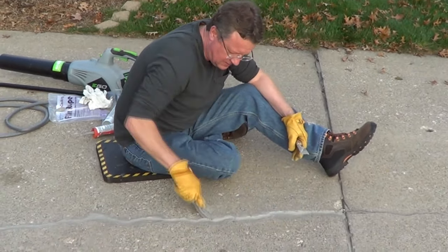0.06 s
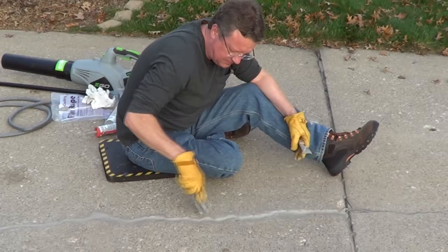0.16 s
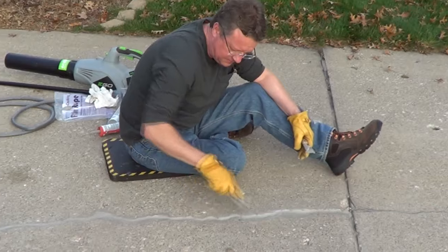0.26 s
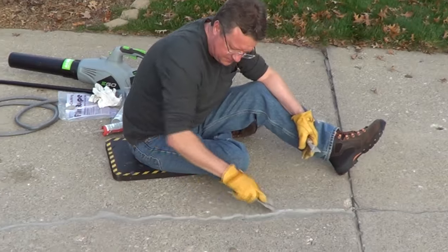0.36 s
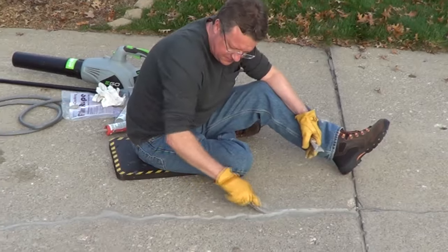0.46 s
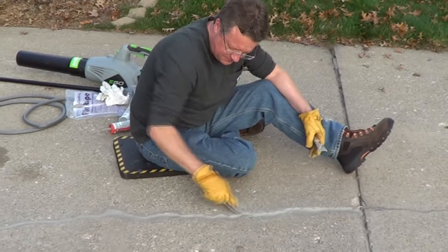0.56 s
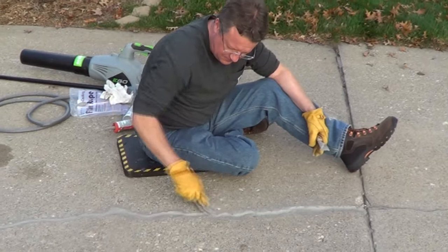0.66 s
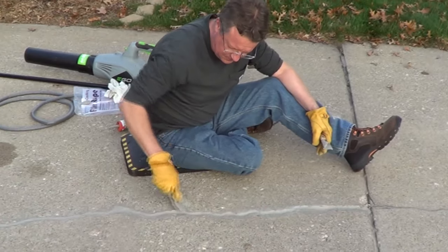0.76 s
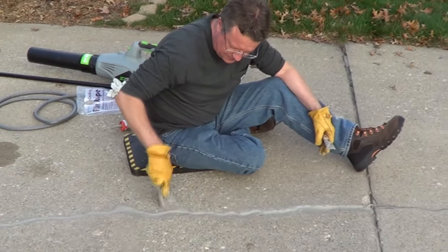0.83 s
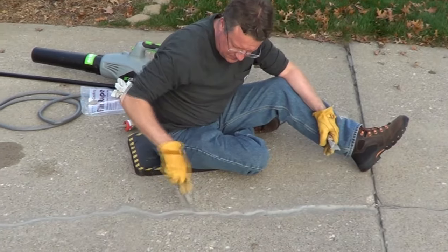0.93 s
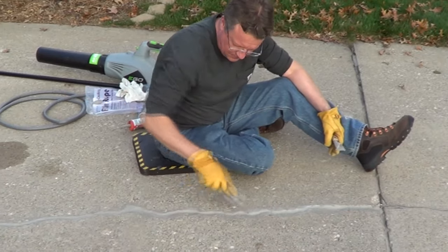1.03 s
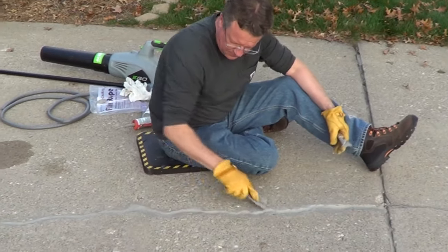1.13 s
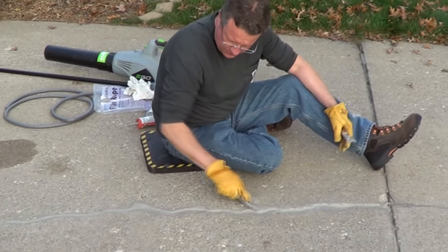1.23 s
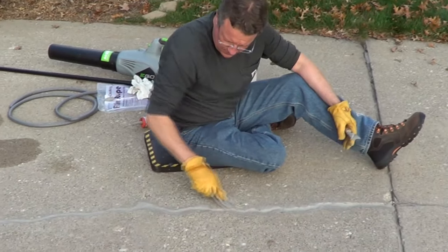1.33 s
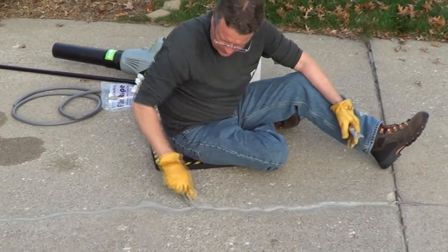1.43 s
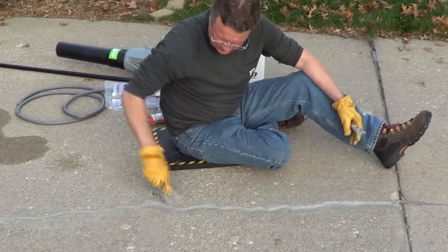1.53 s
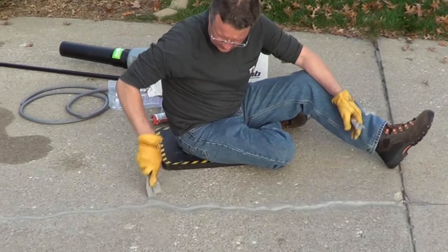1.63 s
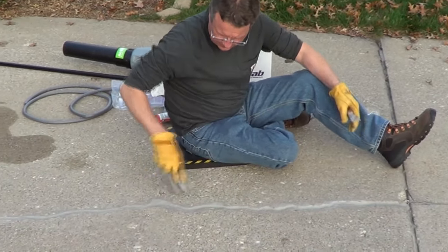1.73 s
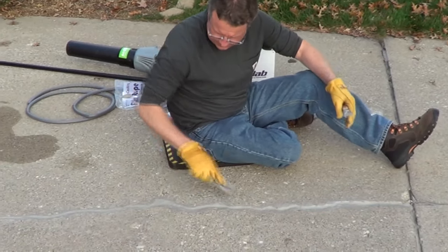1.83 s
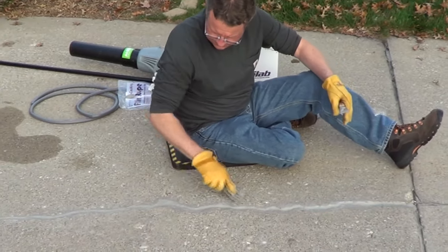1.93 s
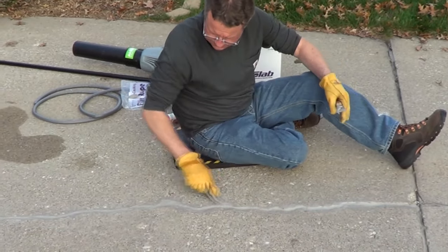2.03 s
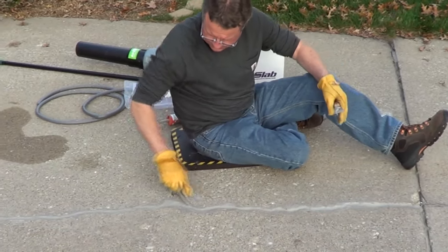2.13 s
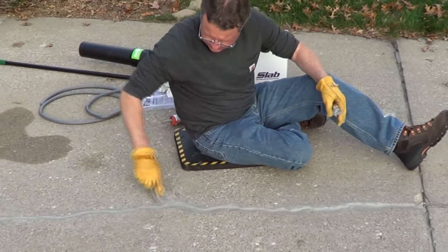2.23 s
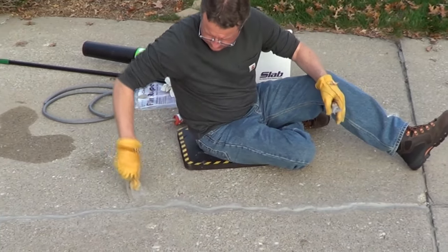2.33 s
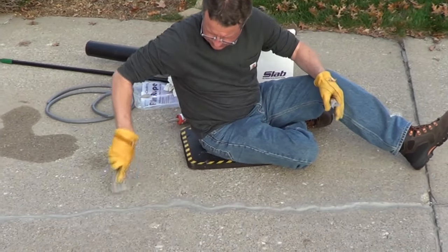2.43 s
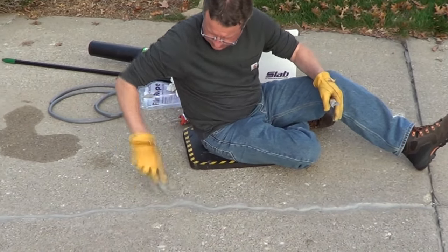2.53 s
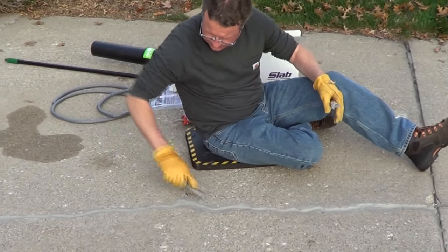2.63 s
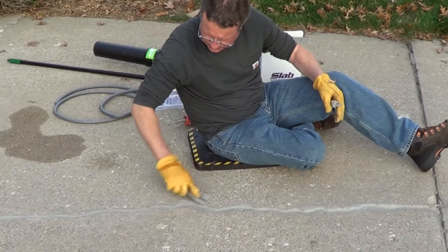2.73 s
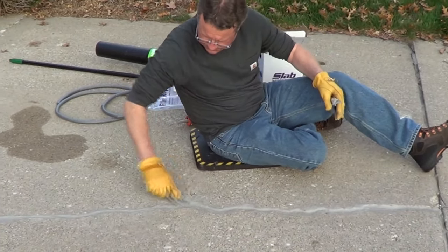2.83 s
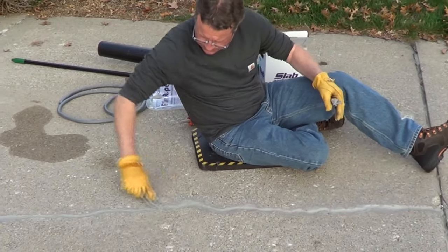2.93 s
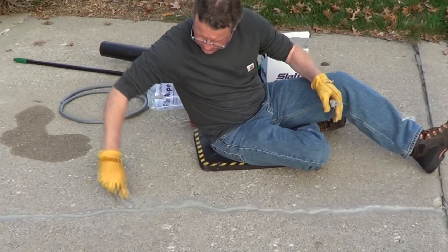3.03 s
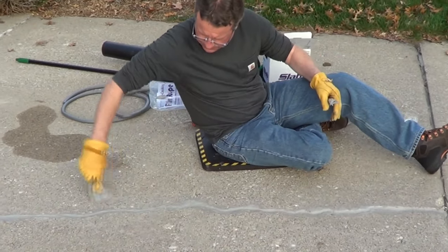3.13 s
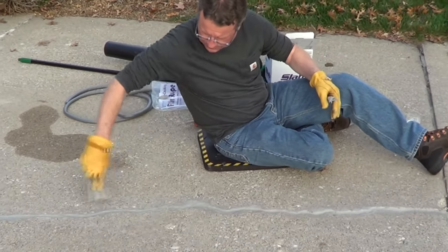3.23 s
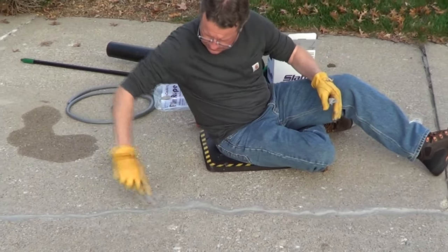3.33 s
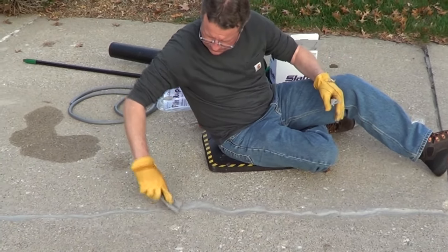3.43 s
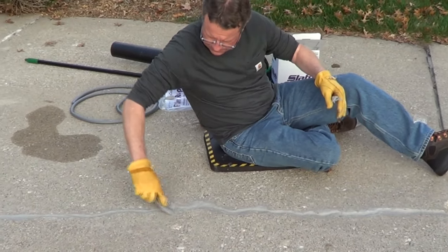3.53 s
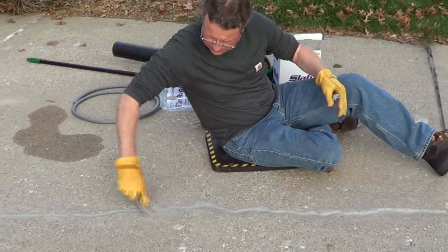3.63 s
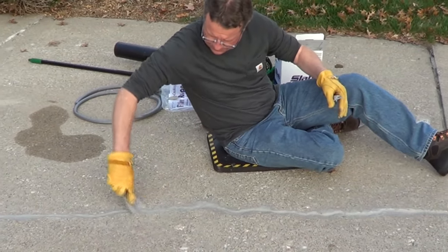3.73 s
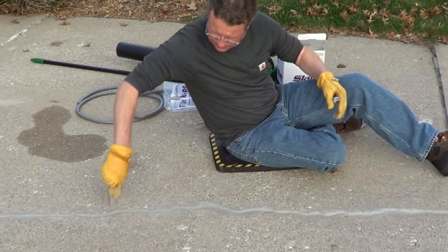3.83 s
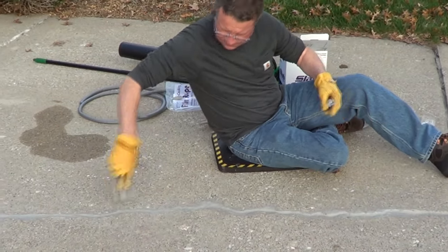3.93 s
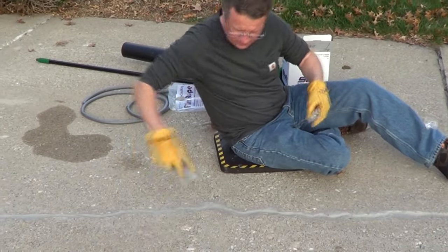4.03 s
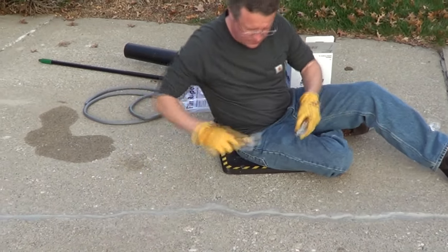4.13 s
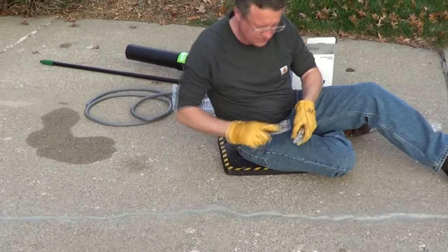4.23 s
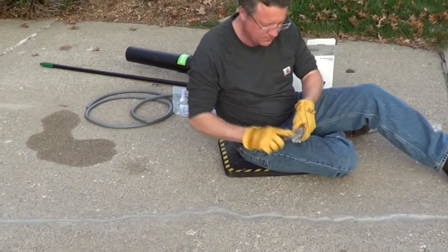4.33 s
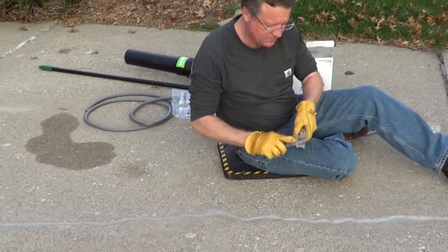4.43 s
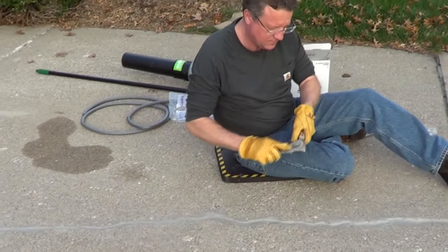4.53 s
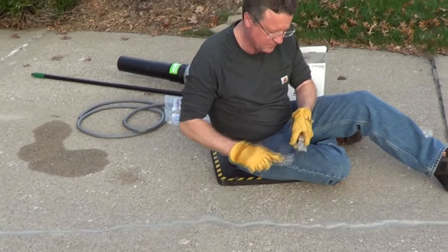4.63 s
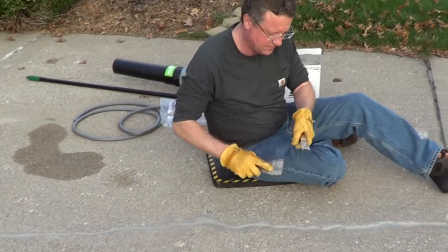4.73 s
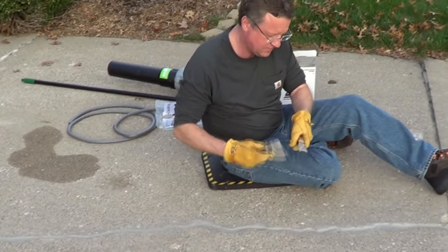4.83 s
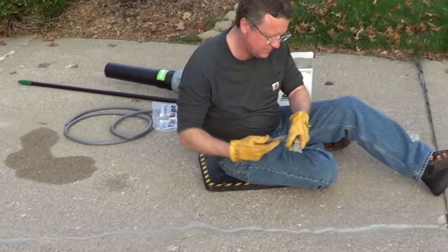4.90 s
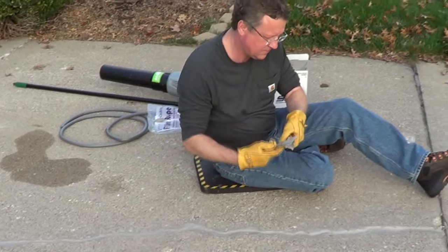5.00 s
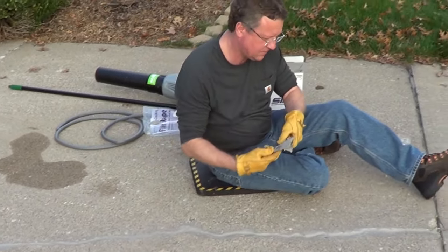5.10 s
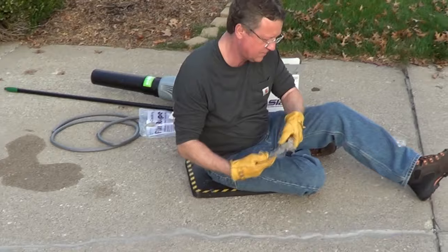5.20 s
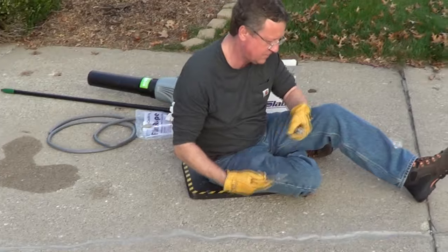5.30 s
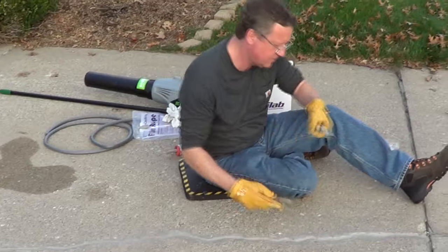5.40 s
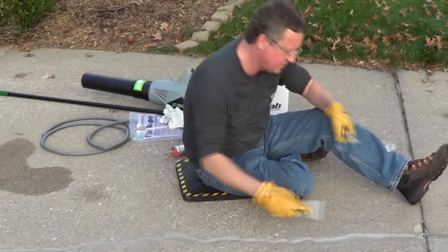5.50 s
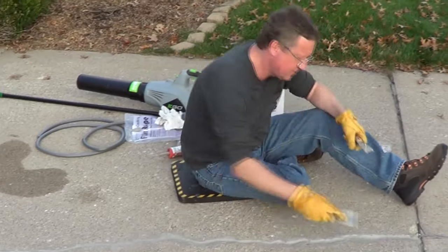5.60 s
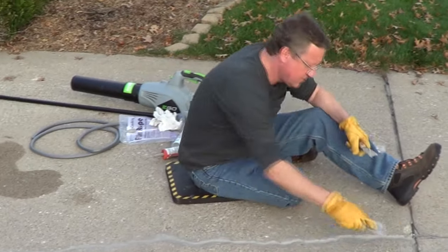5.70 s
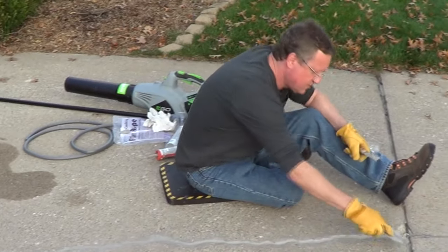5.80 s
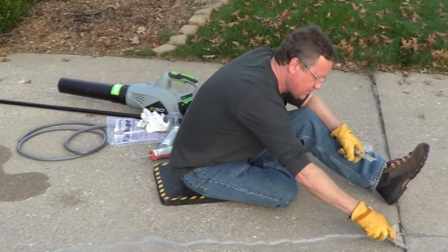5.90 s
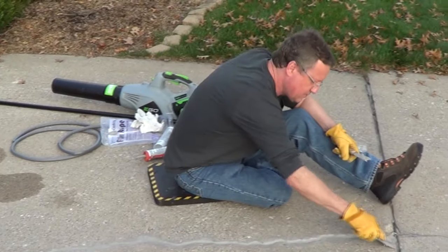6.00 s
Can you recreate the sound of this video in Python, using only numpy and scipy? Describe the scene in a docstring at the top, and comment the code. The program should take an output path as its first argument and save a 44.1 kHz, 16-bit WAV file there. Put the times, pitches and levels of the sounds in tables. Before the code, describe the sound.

A steel hand scraper makes six short gritty strokes on concrete, then two blades wipe and clink together, over distant traffic.

```python
"""Gritty scraping: a steel hand scraper smooths sealant along a crack in a concrete driveway.
Six short strokes, the first under way, the rest begun with a tap; grit catches and rings the blade.
The handle knocks in the glove; then the blade is wiped twice on a second knife, with hiss and clinks.
House fronts return a soft echo over distant traffic, a far engine drone and one passing motor."""
import sys
import numpy as np
from scipy import signal
from scipy.fft import rfft, irfft, next_fast_len
from scipy.io import wavfile
from scipy.ndimage import uniform_filter1d

SR = 44100
rng = np.random.default_rng(int(sys.argv[2]) if len(sys.argv) > 2 else 0)


def dump_mix(stems):
    """Bounce the given channels to the path in sys.argv[1] as a 16-bit WAV at rate SR."""
    frames = np.atleast_2d(stems).T  # one column per channel
    limited = np.clip(frames, -1, 1)  # hard clip at full scale
    pcm = np.round(limited * 32767).astype(np.int16)
    wavfile.write(sys.argv[1], SR, pcm)


N = 267069
TIME_S = np.arange(N) / SR
FFT_SIZE = next_fast_len(N + SR)
FREQ_HZ = np.maximum(np.arange(FFT_SIZE // 2 + 1) * SR / FFT_SIZE, 1)

# strokes: start/s, attack/s, lift/s, level at lift/dB, fine grit/dB, pitch factor, edge singing/dB
STROKES = [ (-0.12, .04, 0.22, -17, 1.5, 1, 2.5), (0.544, 0.036, 0.935, -17, 1, 1.008, 1),
           (1.302, 0.049, 1.728, -16.5, -0.5, 1.001, 0.5), (2.057, 0.031, 2.5, -16.5, -1.5, 1.013, 0),
           (2.84, .052, 3.281, -18, -0.4, 1.004, 1), (3.605, 0.11, 3.947, -16.5, -1.5, 1.012, 0.5), ]
# steel modes: f/Hz, width/Hz, level/dB
PRESSED_BLADE_MODES = [(659, 210, -7.5), (1115, 640, -7.5), (1528, 310, 0), (2157, 335, 2), (2830, 530, -1),
                       (3600, 480, -1.5), (4474, 450, -3.5), (5060, 610, -0.5), (5790, 160, -1.5),
                       (6370, 370, -3), (7010, 500, -3), (7800, 580, 1), (8980, 820, -3), (10200, 1240, -4),
                       (11840, 1100, -4.5)]
THIN_EDGE_MODES = [(8330, 510, 0.5), (10870, 990, -5)]
FREE_BLADE_MODES = [(1660, 160, 5.5), (2200, 230, -9.5), (3000, 450, -30), (3560, 200, 7), (4640, 330, 2),
                    (5730, 480, 5), (6900, 560, 3), (8100, 710, 2), (8900, 640, 8), (10530, 700, 5.5),
                    (11640, 950, 3)]  # barely touching the slab
KNIFE_PAIR_MODES = [(2090, 380, -4.5), (2750, 250, -4), (3280, 300, -1), (3640, 250, -2), (4550, 450, -5),
                    (5500, 450, .5), (6350, 350, .5), (7000, 400, -2), (7750, 380, 2), (8600, 800, 0),
                    (10480, 600, -3), (11550, 650, -1.5)]
# noise spectra: f/Hz, level/dB
GRIT_SPECTRUM = [(250, -16), (550, -5.5), (1200, 1), (3000, -1), (6000, -1.5), (9000, -2), (12000, -8),
                 (13300, -4), (15000, 1), (15800, -21)]
TRAFFIC_SPECTRUM = [(15, -64), (25, -31), (82, -15), (129, -9), (193, -0.5), (281, -3.5), (399, -11.5),
                    (457, -12.5), (509, -12.5), (762, -8.5), (1340, -13.5), (3530, -29.5), (3930, -27),
                    (13500, -38.5), (15500, -41)]
WIPE_SPECTRUM = [(600, -22), (1300, -10), (2200, -0.5), (5000, -1), (9000, 3.5), (11500, 5), (13300, -2),
                 (15800, -5)]
# yard echo: f/Hz, level/dB, t60/s
ECHO_BANDS = [(418, -24.5, 0.74), (905, -23, 1.1), (1410, -20, 0.64), (3140, -23.5, 0.89),
              (5200, -25, 0.95), (7000, -26.5, 0.89), (9700, -26, 0.49), (14000, -38, 0.25)]
# engine orders: f/Hz, level/dB
DRONE_ORDERS = [(93.5, -67.5), (142, -65), (187, -58), (281, -59.5), (472, -62.5)]
PASSING_ORDERS = [(104, -64), (167, -57), (281, -50.5), (319, -55)]
# edge lands or skips on the slab: t/s, level/dB
TAPS = [(0.5203, -12), (0.568, -15), (1.2679, -15), (1.306, -22), (1.327, -12.5), (2.0522, -15),
        (2.057, -13.5), (2.805, -17), (2.856, -15.5), (3.5665, -18), (3.595, -22), (3.609, -17),
        (3.6385, -18.5)]
# handle in the glove: t/s, level/dB, f/Hz, width/Hz
KNOCKS = [(2.519, -29, 850, 220), (3.973, -24.5, 900, 197.8), (4.442, -38, 2440, 1300),
          (4.459, -37.5, 2900, 2200), (4.714, -27, 1330, 1200)]
# knives meet or slip off: t/s, level/dB, rise/s, decay/s
CLINKS = [(4.46, -43, 0.0012, 0.00238), (4.547, -32, 0.00018, 0.00097), (4.693, -23.5, .0002, 0.0014),
          (4.7121, -18, 0.0025, 0.0035), (5.115, -9.5, 0.000715, 0.0013), (5.149, -25, 0.00073, 0.0036),
          (5.1966, -19, .0003, 0.0033), (5.312, -13, 0.0024, 0.0047)]
# steel slides on steel: start/s, end/s, level/dB
WIPES = [(4.549, 4.708, -44.5), (5.14, 5.309, -33)]
# width of diffuse sound: f/Hz, side minus mid/dB
DIFFUSE_SIDE = [(30, -28), (250, -26), (600, -20), (1400, -7), (3500, -3), (7000, -6), (12000, -22)]
# hand position and microphone port sensitivity: f/Hz, left minus right/dB
HAND_PAN = [(500, .3), (2000, .9), (4500, 2.3), (7500, 3.2), (9500, .3), (11000, 0)]
PORT_BALANCE = [(60, .4), (500, 1.2), (2000, 1.2), (4500, 0), (8000, -.6), (11000, 0)]
# phase between the ports: f/Hz, left lead/rad
PORT_LEAD = [(30, .1), (120, 0.38), (250, 0.7), (520, 1.18), (1210, 1.41), (2930, 1.01), (5200, 0.75),
             (7500, 0.67), (10000, 0)]


def undb(db):
    """Decibels to gain."""
    return 10 ** (np.asarray(db) / 20)


def unit(x):
    """Scale to rms 1."""
    return x / np.sqrt(np.mean(x ** 2))


def spectrum(rows):
    """Frequency table interpolated to every bin."""
    hz, values = np.transpose(rows)
    return np.interp(np.log(FREQ_HZ), np.log(hz), values)


def shape(x, response):
    """Apply a frequency response."""
    return irfft(rfft(x, FFT_SIZE) * response, FFT_SIZE)[..., :N]


def colour(rows):
    """Minimum-phase response of unit power from f/Hz, level/dB rows."""
    cepstrum = irfft(np.log(unit(undb(spectrum(rows))) + 1e-6), FFT_SIZE)
    cepstrum[1:FFT_SIZE // 2] *= 2
    cepstrum[FFT_SIZE // 2 + 1:] = 0
    return np.exp(rfft(cepstrum))


def lowpass(hz):
    """Zero-phase response, 24 dB/octave."""
    return 1 / (1 + (FREQ_HZ / hz) ** 4)


def noise():
    """White noise, rms 1."""
    return rng.standard_normal(N)


def walk(rate_hz):
    """Smoothly joined random levels, spread near 1."""
    step = max(int(SR / rate_hz), 2)
    levels = np.repeat(rng.standard_normal(N // step + 1), step)
    return 1.155 * uniform_filter1d(levels, step)[:N]


def gate(start_s, end_s, rise_s, fall_s):
    """Envelope: 1 from start to end, exponential flanks outside."""
    return np.exp(-np.maximum(start_s - TIME_S, 0) / rise_s - np.maximum(TIME_S - end_s, 0) / fall_s)


def stick_slip(rate_hz, spread_db, decay_s, bed):
    """Roughness over a bed of even friction: the longer the stick, the harder the slip."""
    stick_draw, strength_draw = np.clip(rng.standard_normal((N // 20, 2)), -2, 2).T
    stick = np.exp(.45 * stick_draw)
    at = np.cumsum(stick * SR / rate_hz).astype(int)
    energy = stick * undb(spread_db * strength_draw) ** 2
    slips = np.bincount(at[at < N], energy[at < N], N)
    power = signal.lfilter([1], [1, -np.exp(-2 / (decay_s * SR))], slips)
    return unit(np.sqrt(power / power.mean() + bed))


def ring(force, modes, pitch=1, flare_db=0):
    """Grains hit different spots: each mode gets a random share, swelling as the tool rocks."""
    out, live = np.zeros(N), force > 1e-9
    rocking = walk(rate_hz=55)
    for hz, width_hz, db in modes:
        share = rng.standard_normal(live.sum())
        share *= undb(flare_db * np.roll(rocking, rng.integers(N))[live])
        b, a = signal.iirpeak(hz * pitch, hz * pitch / width_hz, fs=SR)
        out[live] += undb(db) * signal.lfilter(b, a, signal.lfilter(b, a, force[live] * share))
    power = sum(undb(db) ** 2 * np.pi * width_hz / SR / 2 for _, width_hz, db in modes)
    return out / np.sqrt(power)


def scraping():
    """Edge on concrete: coarse grit growls low in the blade, fine grit hisses, the thin edge sings."""
    touch_db, lean_db_per_s = -14, 9  # light start, then the hand leans in
    fine_db_per_s = -16.5  # the blade flattens along the stroke
    dig_db, dig_s = 1.5, .035  # the edge digs in just before the lift
    roughness = stick_slip(rate_hz=400, spread_db=2.1, decay_s=.0014, bed=.45)
    roughness *= undb(1.57 * walk(rate_hz=22))  # rougher and smoother patches
    grit_colour, out = colour(GRIT_SPECTRUM), 0
    for start_s, attack_s, lift_s, db, fine_db, pitch, sing_db in STROKES:
        bite = np.clip((TIME_S - start_s) / attack_s, 0, 1)
        from_lift_s = np.clip(TIME_S, start_s, lift_s) - lift_s
        pressure = undb(db + touch_db * (1 - bite) + lean_db_per_s * from_lift_s)
        force = roughness * pressure * gate(start_s, lift_s, rise_s=.002, fall_s=.008)
        blade = undb(-3) * ring(force, PRESSED_BLADE_MODES, pitch, flare_db=2.5)
        edge = undb(sing_db - 8.5) * ring(force, THIN_EDGE_MODES, pitch, flare_db=2.5)
        grit = undb(-10) * shape(force * noise(), grit_colour)
        scrape = blade + edge + grit
        low = shape(scrape, lowpass(hz=3000))
        high = shape(scrape, 1 - lowpass(hz=6800))
        middle = scrape - low - high
        coarse_gain = undb(.12 + dig_db * np.exp(from_lift_s / dig_s))
        fine_gain = undb(fine_db - 3 + fine_db_per_s * from_lift_s)
        out = out + coarse_gain * low + middle + fine_gain * high
    return out


def diffuse(mid, side):
    """Sound from all around: wide in the upper mids, near mono in bass and high treble."""
    return mid + np.array([[1], [-1]]) * shape(side, undb(spectrum(DIFFUSE_SIDE)))


def echo_pattern():
    """Mid and side impulse response of house fronts and trees, in quarter octaves."""
    tail, age_s, bin_hz = 0, TIME_S[:SR], np.arange(SR // 2 + 1)
    white = rfft(rng.standard_normal((2, SR)))
    hz, *columns = np.transpose(ECHO_BANDS)
    near_walls = undb(16.5 - 60 * age_s / .24)
    for low_hz in 350 * 2 ** (np.arange(23) / 4):
        db, t60_s = (np.interp(np.log(low_hz * 1.09), np.log(hz), column) for column in columns)
        band = (bin_hz >= low_hz) & (bin_hz < low_hz * 2 ** .25)
        street = undb(-60 * age_s / t60_s)
        tail = tail + undb(db) * (near_walls + street) * irfft(white * band, SR)
    onset = np.clip(age_s / .0013, 0, 1)
    return tail * onset / np.sqrt(SR / 10)


def yard_echo(x, patterns=3):
    """Summed over all directions, steel peaks blur to hiss; the moving hand crossfades echo patterns."""
    envelope = np.sqrt(np.abs(uniform_filter1d(x ** 2, size=220)))
    radiated = undb(-3) * x + undb(.5) * shape(envelope * noise(), colour(GRIT_SPECTRUM))
    mid_side = 0
    for k in range(patterns):
        share = np.sqrt(2 / patterns) * np.cos(np.pi * (2.732 * TIME_S + k / patterns))
        mid_side = mid_side + shape(radiated * share, rfft(echo_pattern(), FFT_SIZE))
    return diffuse(*mid_side)


def swell_db(far_db, rise_db, peak_s, half_width_s):
    """Level of a source that nears and recedes."""
    return far_db + rise_db / (1 + ((TIME_S - peak_s) / half_width_s) ** 2)


def traffic():
    """Far roads: boom, rumble and tyre hiss, each swelling once."""
    road_colour = colour(TRAFFIC_SPECTRUM)
    roads = diffuse(shape(noise(), road_colour), shape(noise(), road_colour))
    deep, low = lowpass(hz=110), lowpass(hz=400)
    boom_db = swell_db(far_db=-9, rise_db=12, peak_s=6, half_width_s=2.9)
    rumble_db = swell_db(far_db=-9.5, rise_db=8, peak_s=4.5, half_width_s=.7)
    hiss_db = swell_db(far_db=-2, rise_db=5.5, peak_s=5.5, half_width_s=1.33)
    boom = shape(roads, deep) * undb(boom_db)
    rumble = shape(roads, low - deep) * undb(rumble_db + 3 * walk(rate_hz=3.91))
    hiss = shape(roads, 1 - low) * undb(hiss_db + .5 * walk(rate_hz=3.8))
    return boom + rumble + hiss


def engine(orders, waver, flutter_db):
    """Far engine orders that waver and fade on their way through the air."""
    warped_s = np.cumsum(1 + waver * walk(rate_hz=3)) / SR
    out = 0
    for hz, db in orders:
        rms = undb(db + flutter_db * walk(rate_hz=6.5))
        out = out + np.sqrt(2) * rms * np.sin(2 * np.pi * hz * warped_s)
    return out


def taps():
    """The edge lands with a brief rattle and bounces once."""
    bounce_s, bounce_db, force = .019, -14.5, 0
    for land_s, db in TAPS:
        for t_s, hit_db in (land_s, db), (land_s + bounce_s, db + bounce_db):
            force = force + undb(hit_db) * gate(t_s, t_s, rise_s=.0001, fall_s=.0027)
    blade = undb(-3) * ring(force, FREE_BLADE_MODES)
    grit = undb(-8) * shape(force * noise(), colour(GRIT_SPECTRUM))
    return blade + grit


def knocks():
    """The handle knocks in the glove: one short dull mode each."""
    out = 0
    for t_s, db, hz, width_hz in KNOCKS:
        force = undb(db) * gate(t_s, t_s, rise_s=.0016, fall_s=.0067)
        out = out + ring(force, [(hz, width_hz, 0)])
    return out


def wiping():
    """One blade meets the other, judders along it with a fine hiss and snaps off its end."""
    tip_db, tip_s, rub = 9.5, .014, 0  # the rub tightens at the tip
    for start_s, end_s, db in WIPES:
        pressure = undb(db + tip_db * gate(end_s, end_s, tip_s, tip_s))
        rub = rub + pressure * gate(start_s, end_s, rise_s=.00099, fall_s=.0059)
    judder = stick_slip(rate_hz=170, spread_db=2.2, decay_s=.004, bed=.6)
    slide = undb(-2.5) * rub * judder
    clinks = sum(undb(db) * gate(t_s, t_s, rise_s, decay_s) for t_s, db, rise_s, decay_s in CLINKS)
    steel = ring(undb(-2) * slide + undb(-7) * clinks, KNIFE_PAIR_MODES, flare_db=2)
    hiss = undb(-3) * shape((slide + clinks) * noise(), colour(WIPE_SPECTRUM))
    return steel + hiss


def pan(x, rows):
    """Split a level difference between left and right."""
    return shape(x, undb(np.array([[.5], [-.5]]) * spectrum(rows)))


def at_ports(x):
    """The left microphone port leads in phase, most in the mids."""
    half_lead = np.exp(.5j * spectrum(PORT_LEAD))
    return shape(x, np.array([half_lead, 1 / half_lead]))


def scene():
    """Scraper and knives near left; echo, engines and traffic beyond."""
    bass_cut = signal.butter(4, 450, "high", fs=SR, output="sos")  # a small blade radiates little bass
    scraper = signal.sosfilt(bass_cut, undb(5) * scraping() + undb(.5) * taps() + knocks())
    knives = undb(-.05) * wiping()
    echo = yard_echo(undb(1) * scraper + undb(-7) * knives)
    drone = engine(DRONE_ORDERS, waver=.00812, flutter_db=1)
    passing = engine(PASSING_ORDERS, waver=.01505, flutter_db=3) * gate(4.39, 5, rise_s=.28, fall_s=.32)
    return at_ports(pan(scraper + knives, HAND_PAN) + echo + drone + passing + undb(-42) * traffic())


def gain_control(x, knee_db, squeeze, memory_s):
    """Gain drops as smoothed power rises."""
    pole = np.exp(-1 / (memory_s * SR))
    power = signal.lfilter([1 - pole], [1, -pole], np.mean(x ** 2, axis=0))
    return x * (1 + power / undb(knee_db) ** 2) ** (-squeeze / 2)


def record(dry):
    """Microphone chain: unequal ports, gain control, soft clip, faint steady whine, top cut."""
    whine_hz, top_hz = 15735, 15770
    levelled = gain_control(pan(dry, PORT_BALANCE), knee_db=-21, squeeze=.45, memory_s=.014)
    whine = undb(-58.5) * np.sin(2 * np.pi * whine_hz * TIME_S)
    top_cut = signal.ellip(10, .2, 70, top_hz, fs=SR, output="sos")
    return signal.sosfilt(top_cut, np.tanh(levelled) + whine)


dry = scene()
out = record(dry)
dump_mix(out)
```